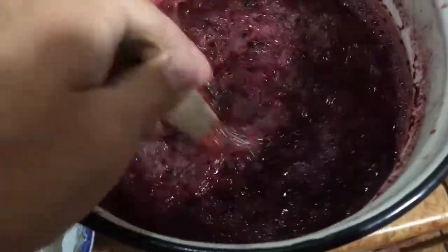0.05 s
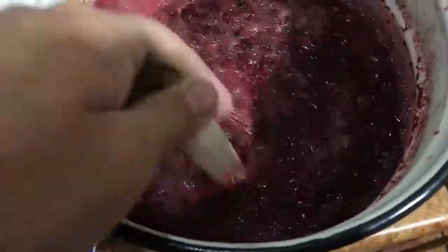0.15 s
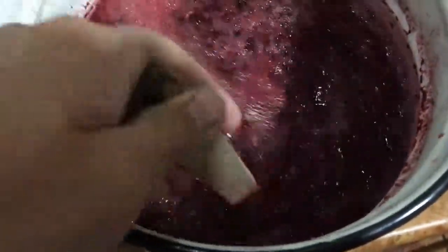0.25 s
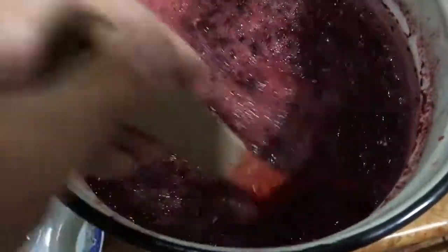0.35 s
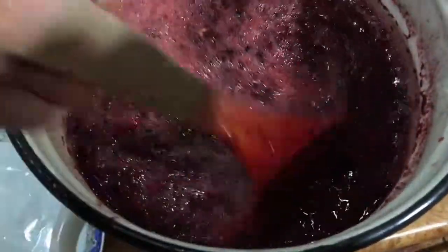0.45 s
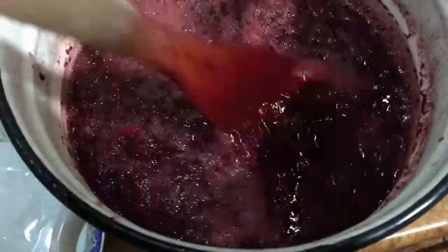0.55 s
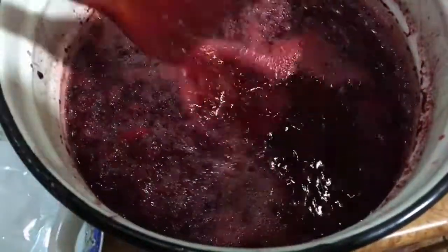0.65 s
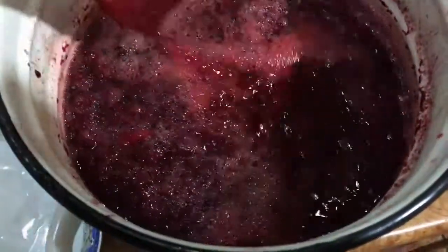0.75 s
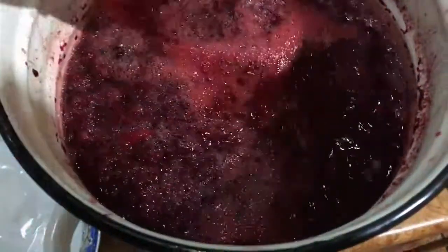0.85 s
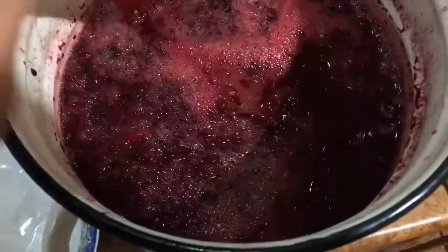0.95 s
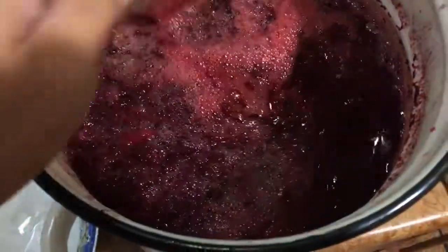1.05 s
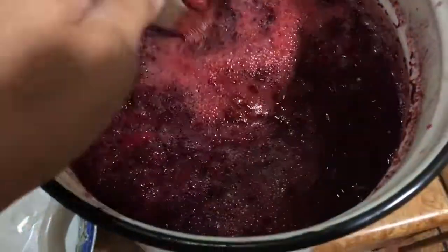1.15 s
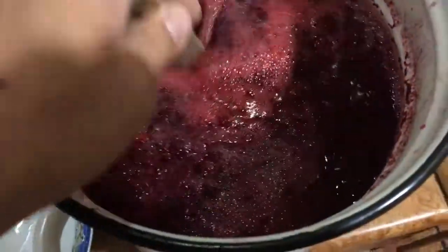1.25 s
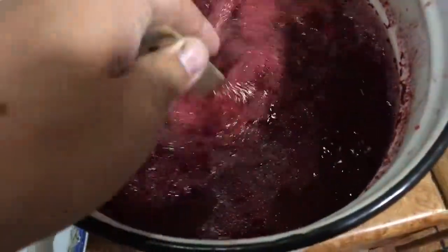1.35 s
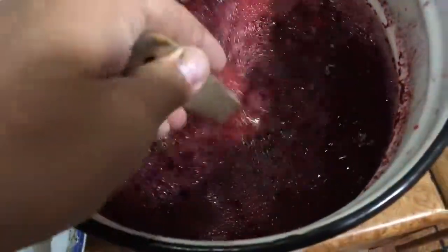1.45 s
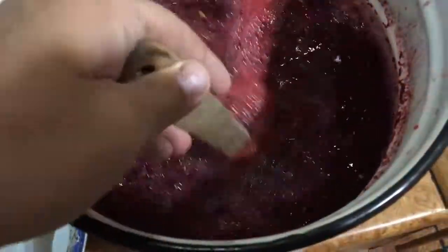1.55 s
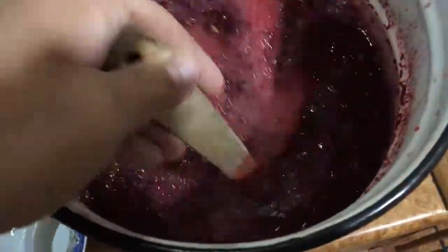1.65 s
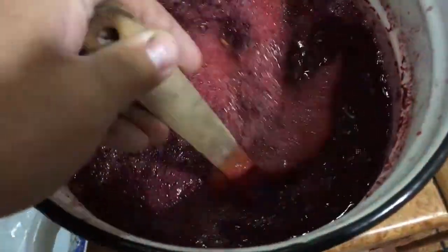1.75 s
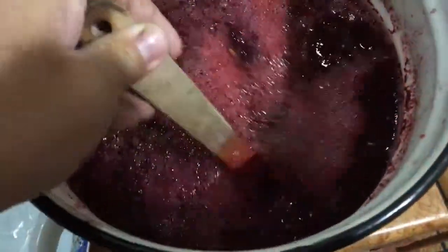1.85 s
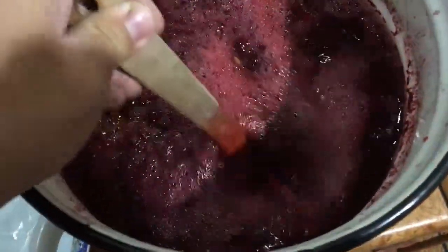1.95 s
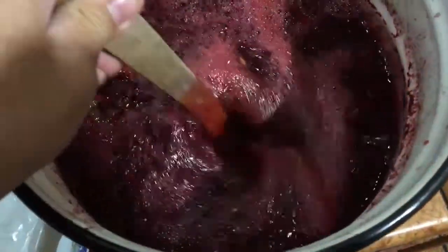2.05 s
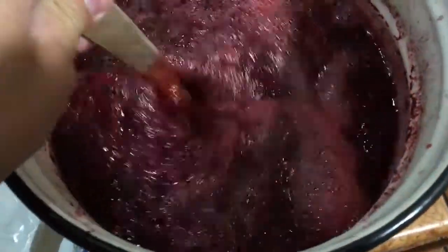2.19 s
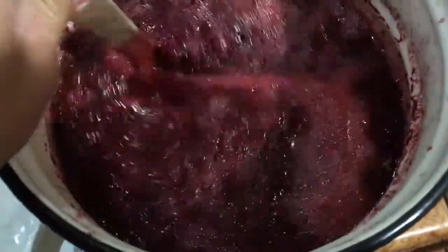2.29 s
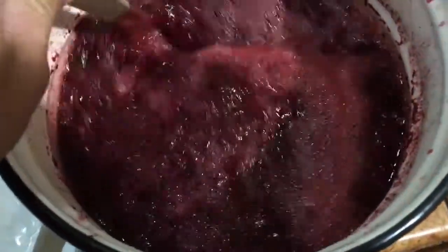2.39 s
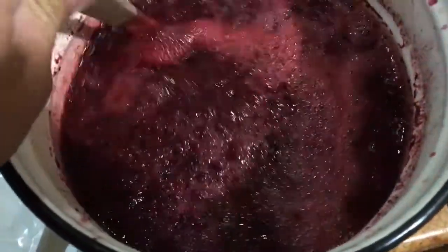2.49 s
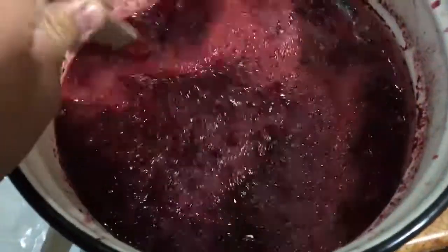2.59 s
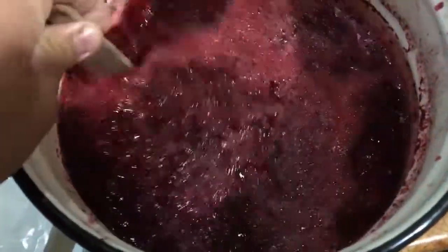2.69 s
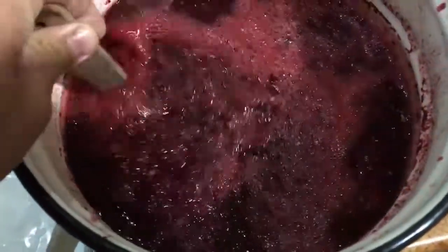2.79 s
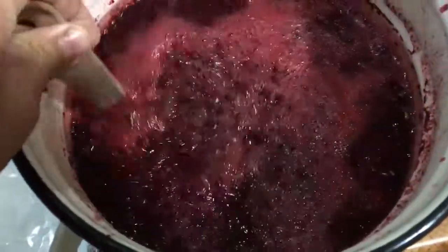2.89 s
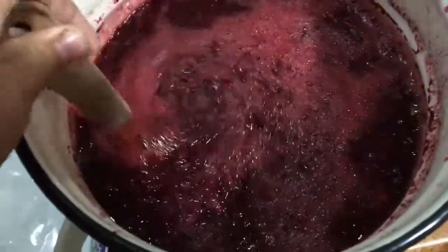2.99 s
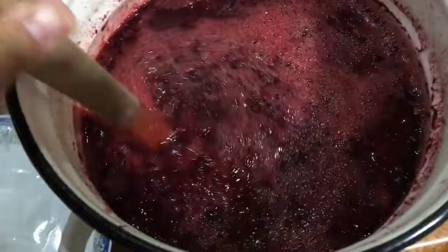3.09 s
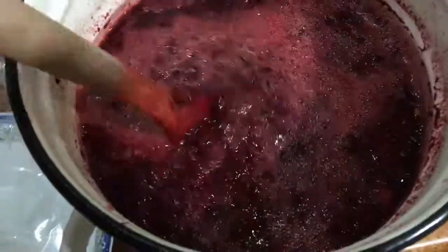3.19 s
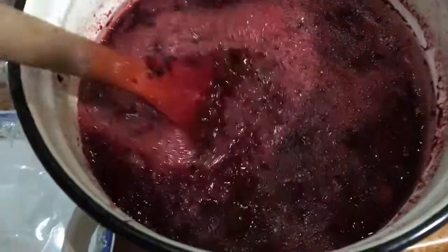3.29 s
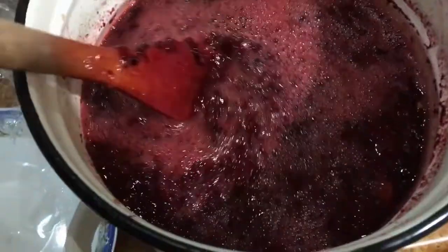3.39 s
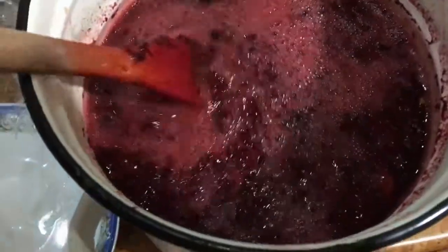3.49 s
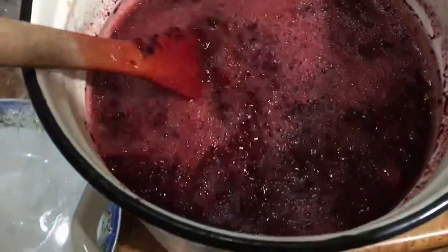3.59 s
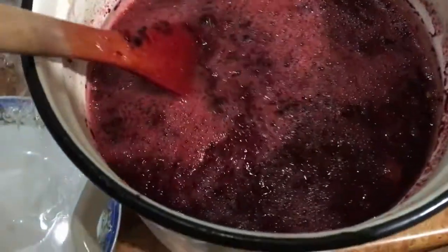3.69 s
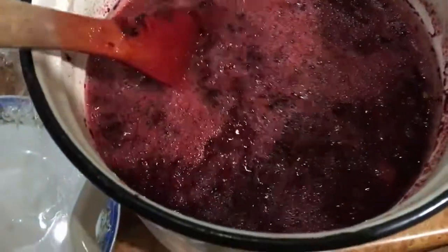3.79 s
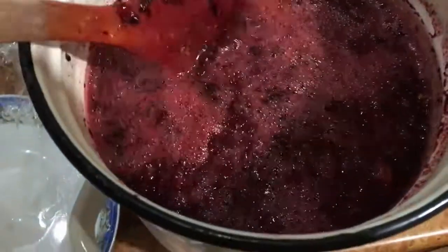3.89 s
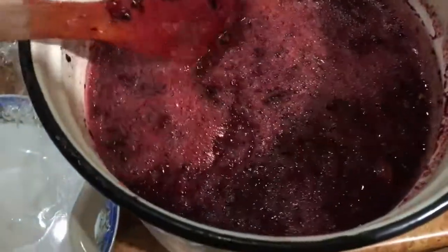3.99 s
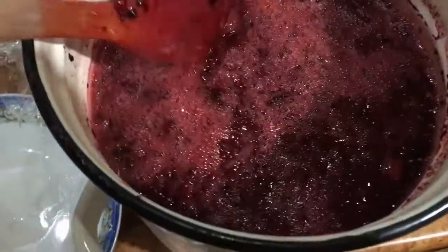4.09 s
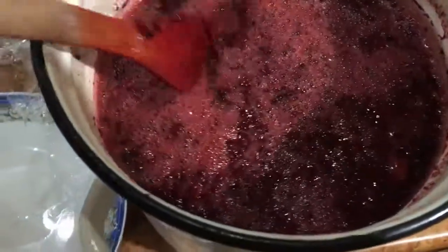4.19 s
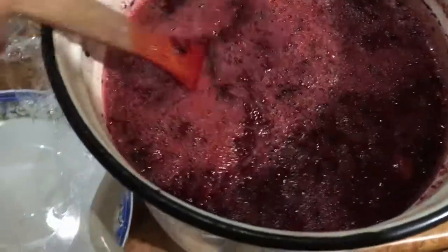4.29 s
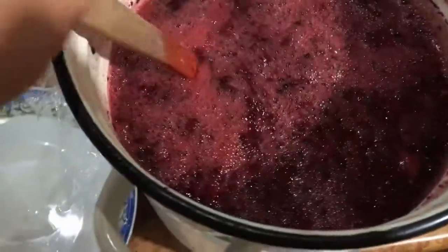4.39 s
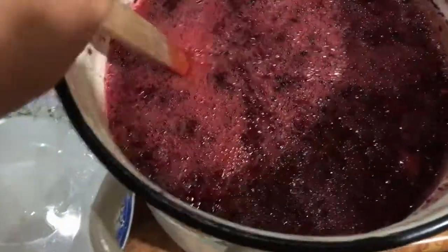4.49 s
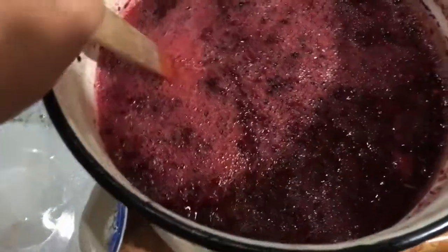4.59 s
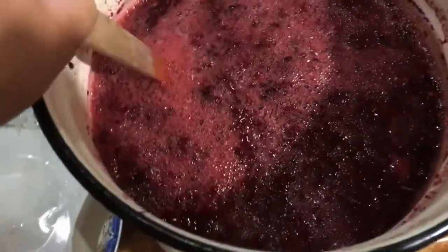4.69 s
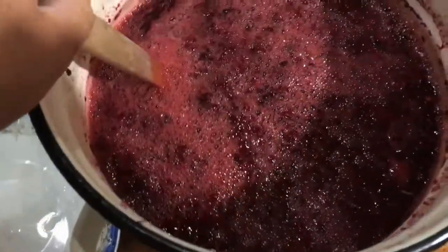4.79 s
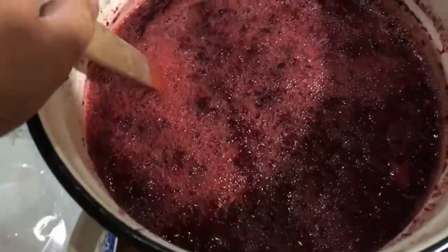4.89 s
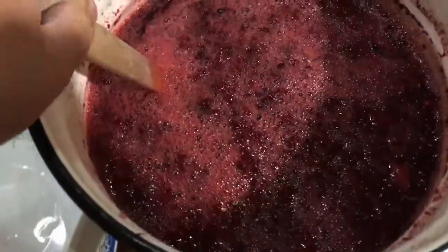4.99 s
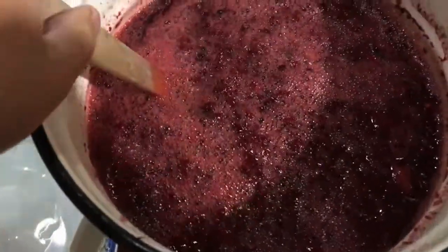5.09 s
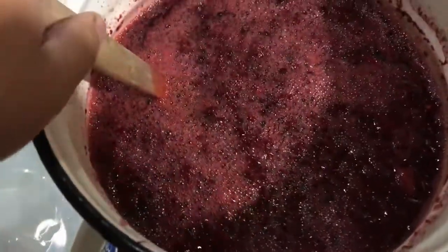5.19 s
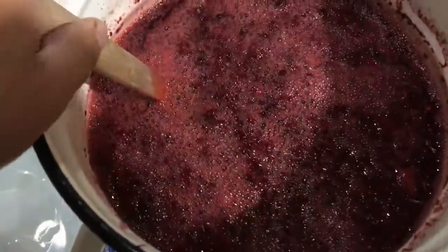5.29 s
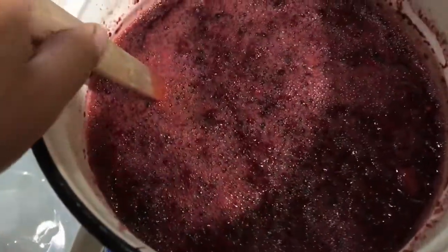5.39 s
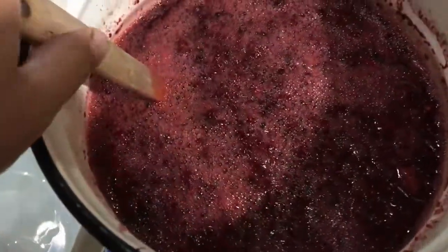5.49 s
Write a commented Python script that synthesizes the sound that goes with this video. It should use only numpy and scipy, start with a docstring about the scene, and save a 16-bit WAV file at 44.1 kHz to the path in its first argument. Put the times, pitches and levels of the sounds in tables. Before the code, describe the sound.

A wooden spatula stirs bubbling fruit mash in an enamel pot, heard close with a short room echo. First a low slosh and rubbing scrape, then muffled thuds with brief drags, wet snapping in the middle, one hard knock, and finally quiet fizz with softer double knock and tiny pitched bubbles.

```python
"""First heard: a low wet slosh and a wooden scrape over fine fizz, then dull knocks, clicks and crackle.
Place: a small kitchen, where a wooden spatula stirs fizzing fruit mash in an enamel pot on a counter.
Shaped noise makes rumble and slosh; short damped tones make fizz, crackle, clicks, bubbles and slips.
Blows and irregular grips of the blade ring the damped modes of the pot. The room echoes all but the
rumble, slosh, fizz and crackle; one microphone channel loses the deepest bass and the extreme treble."""
import sys
import numpy as np
from scipy import signal
from scipy.fft import rfft, irfft
from scipy.io import wavfile
from scipy.ndimage import uniform_filter1d

SR = 44100
rng = np.random.default_rng(int(sys.argv[2]) if len(sys.argv) > 2 else 0)


def master(y):
    """Save y as 16-bit WAV."""
    cut = np.clip(np.atleast_2d(y).T, -1, 1)
    pcm = np.round(cut * 32767)  # scale
    wavfile.write(sys.argv[1], SR, pcm.astype(np.int16))


N = 244660

# kitchen rumble and slosh of the mash: [t/s, rumble level/dB, slosh level/dB]
SLOSH_LEVELS = [(0, -53, -42.5), (.15, -60, -58), (.28, -62, -60.5), (.5, -69, -66), (1.0, -63.5, -60.5),
                (1.6, -65.5, -64.5), (2.7, -61.5, -60.5), (3.4, -68.5, -63.5), (4.2, -65, -67),
                (4.7, -59.5, -62), (5.15, -67.5, -66.5), (5.55, -62, -66.5)]
# common colour of rumble and slosh: [f/Hz, relative density/dB]
SLOSH_SPECTRUM = [(15, -35), (25, -5), (64, 11.5), (124, -1.5), (324, -4.5), (371, -7.5), (546, -8.5),
                  (757, -16.5), (802, -11.5), (1090, -11.5), (1250, -11.5), (1770, -8.5), (2500, -5.5),
                  (3250, -71), (5500, -120)]
# bursting bubbles, before flicker: [t/s, level/dB]
FIZZ_LEVELS = [(0.0, -53.5), (0.46, -54.5), (0.99, -53), (1.59, -54.5), (2.1, -52.5), (3.2, -52.5),
               (4.4, -53.5), (5.33, -56), (5.55, -54.5)]
# colour of the fizz, notched by the echo inside the pot: [f/Hz, relative density/dB]
FIZZ_SPECTRUM = [(900, -31), (1700, -14), (2300, -3.5), (3300, -0.5), (4200, 0.5), (4900, -0.5), (5600, 2),
                 (6800, 4), (7600, 1.5), (8900, 4.5), (9800, 3.5), (10300, -0.5), (11300, 2.5),
                 (16000, -3.5)]
# echo of the kitchen: [f/Hz, t60/s, echo level/dB]
ROOM_ECHO = [(59, 0.35, 7), (247, 0.26, -15.5), (700, 0.2, -12), (1540, 0.26, -7), (4000, 0.083, -8)]
# crackle bursts of skins and foam turned over by the blade: [t/s, level/dB]
CRACKLE_BURSTS = [(2.12, -67), (2.4, -64), (2.79, -62)]
# larger bubbles that burst with a pitch: [t/s, peak level/dB, f/Hz, t60/s]
PITCHED_BUBBLES = [(4.636, -53, 614, 0.015), (4.789, -68, 496, 0.029), (4.982, -56, 700, 0.015),
                   (5.215, -54.5, 1050, 0.016), (5.247, -52, 1100, 0.019)]
# wet clicks and pops in the mash: [t/s, peak level/dB, f/Hz, t60/s, neighbours' relative level/dB]
WET_CLICKS = [(1.125, -39, 2800, .006, -8), (2.11, -42.5, 2970, .008, -7), (2.135, -44, 1390, .008, -1),
              (2.151, -35, 2000, 0.014, -16), (2.169, -38, 3100, 0.01, -15), (2.199, -40, 3300, 0.014, -14),
              (2.239, -33, 2200, 0.029, -7.5), (2.327, -43, 3300, 0.0088, -16),
              (2.8095, -29, 2670, 0.0036, -10.5)]
# slips of the blade that stand out of a stroke: [t/s, peak level/dB, f/Hz, t60/s]
BLADE_SLIPS = [(0.175, -25.5, 461, 0.02), (0.202, -27.5, 470, 0.03), (0.243, -35.5, 376, 0.041),
               (2.805, -39.5, 406, 0.02), (2.918, -49, 295, 0.014), (2.958, -47, 332, 0.04),
               (3.003, -64, 397, 0.028), (3.038, -34.5, 446, 0.04), (3.086, -37.5, 510, 0.013)]
# modes of the filled pot and the counter under it: [f/Hz, level/dB, t60/s before a blow's ring factor]
POT_MODES = [(58.6, -10, 1), (86.2, 4, 0.16), (107, -8.5, 0.68), (182.1, 0.5, 0.32), (239.1, -2.5, 0.31),
             (262.5, 6, 0.086), (308, -3.5, 0.14), (350, 8, 0.086), (417, -4, 0.056), (468, 9.5, 0.055),
             (529, 6.5, 0.064), (613.6, 4.5, 0.073), (659, -13, 0.049), (775, -0.5, 0.037),
             (918, -36, 0.27), (944, -15, 0.15), (994, 0, 0.051), (1094, 0, 0.027), (1208, -13, 0.092),
             (1385, -12.5, 0.06), (1710, -18, 0.044), (2030, -23, 0.11), (2216, -5, 0.071),
             (2760, 5, 0.078), (2870, -1, 0.045), (3160, 14.5, 0.036), (3500, 12, 0.014),
             (4180, -25, 0.018), (4600, -12, .015), (5600, -16, .015)]
# drags along the bottom, one list a stroke: [t/s, level/dB, best excited f/Hz, brightness/dB]
STROKES = [
    [(0, -45.5, 335, -40), (.086, -41, 430, -7.5), (.142, -44, 420, -15.5), (.21, -38.5, 443, -18),
     (.225, -56, 440, -7), (.254, -47.5, 398, -20), (.29, -77, 379, -17)],
    [(.77, -65, 525, -5), (1.1, -63.5, 524, -6), (1.36, -64, 500, -5), (1.41, -42, 380, -20)],
    [(1.45, -43, 337, -18), (1.52, -57, 384, -20), (1.62, -65, 390, -18)],
    [(1.9, -62, 514, -24), (2.1, -72, 380, -6), (2.15, -54.5, 382, -3), (2.23, -75, 405, -14)],
    [(2.66, -78, 478, -23), (2.69, -52.5, 530, -35), (2.752, -51, 570, -35), (2.802, -49, 433, -4),
     (2.852, -52.5, 555, -20), (2.884, -49, 306, -16), (2.974, -48.5, 312, -45), (3.008, -42.5, 414, -26),
     (3.11, -58.5, 516, 4)],
    [(3.12, -67.5, 537, -15), (3.5, -74.5, 533, -12)],
]
# blows of the blade: [t/s, level/dB, best excited f/Hz, spread/octaves, counter boom/dB, boom f/Hz,
# edge crack/dB, crack f/Hz, ring length/factor, shove/dB]
BLOWS = [(.391, -46.5, 430, 0.1, -14.5, 81, -4.5, 990, 1.7, -18),
         (1.097, -30.5, 219, 0.21, -5.5, 111, -16.5, 536, 0.93, -25),
         (1.4032, -13, 242, 0.38, -37, 57.7, -24, 640, 0.89, -31),
         (1.504, -33, 404, 0.14, -30, 80, -32, 900, 1.1, -35),
         (1.754, -32.5, 183, 0.34, -15, 65.4, -20, 483, 1.5, -19),
         (1.78, -44.5, 457, 0.56, -18, 65, -8, 970, 1.2, -22),
         (1.875, -42, 304, 0.41, -32, 80, -16, 890, 1, -27),
         (2.036, -47, 367, 0.18, -28, 81.5, -3, 980, 0.97, -20),
         (2.246, -23, 187, 0.41, -36, 61, -9, 338, 0.97, -14.5),
         (2.4934, -17, 550, 0.42, -25, 80, -9, 250, 0.43, -39),
         (3.5324, -10.5, 456, 0.92, -22, 67, -5, 1328, 0.57, -32),
         (4.529, -45, 173, 0.55, -18, 59, -7, 1320, 0.55, -8),
         (4.665, -29, 263, 0.56, -14.5, 100, -3.5, 1050, 0.67, -20),
         (4.684, -36, 360, 0.28, -3.5, 167, -20, 800, 0.72, -28),
         (5.166, -51.5, 300, 0.49, -7, 80, 2, 1270, 0.64, -13),
         (5.492, -51.5, 760, 0.34, -12, 80, -16, 1100, 0.92, -19)]

CRACKLE_REST_DB, CRACKLE_RISE_DB_PER_S, CRACKLE_FALL_DB_PER_S = -74, 146, 135
SNAP_DB, SNAP_S = 11, 0.0018  # dry puff of a click: level above its neighbours, decay time
STROKE_EDGE_S = 0.011  # the drag sets in and lets go
CHATTER_DB, CHATTER_S = -4.5, 0.0037  # rattle of the edge: level against its crack, decay time
SHOVE_HZ, SHOVE_S = 53.4, 0.015  # thump of the whole pot on its base
MIC_LOW_HZ, MIC_TOP_HZ = 36, 15720


def gain_of(db):
    """Decibels to gain."""
    return 10 ** (np.asarray(db) / 20)


def evened(x):
    """Scales to rms 1."""
    return x / np.sqrt(np.mean(x ** 2) + 1e-20)


def read(points, hz):
    """Reads a spectrum on a log-frequency axis."""
    f, value = np.transpose(points)
    return np.interp(np.log(hz + 1), np.log(f + 1), value)


def curve(rows):
    """One value a sample from rows of [t/s, value]."""
    return np.interp(np.arange(N) / SR, *np.transpose(rows))


def colour(x, points):
    """Shapes a steady sound with a spectrum, rms 1."""
    density_db = read(points, np.fft.rfftfreq(len(x), 1 / SR))
    return evened(irfft(rfft(x) * gain_of(density_db), len(x)))


def band_of(x, order, edges_hz, kind="band"):
    """Filters a sound with Butterworth slopes."""
    return signal.sosfilt(signal.butter(order, edges_hz, kind, fs=SR, output="sos"), x)


def random_hits(count, per_s, spread_db, most):
    """Impulses at random moments, with exponentially spread levels capped at `most` spreads."""
    size = gain_of(spread_db * np.minimum(rng.exponential(1, count), most))
    return size * (rng.random(count) < per_s / SR)


def add(mix, s, sound):
    """Mixes a sound in at time s."""
    part = mix[round(s * SR):][:len(sound)]
    part += sound[:len(part)]


def blip(db, hz, t60, rise_cycles):
    """A short damped ring with a soft start, scaled to its peak level."""
    t = np.arange(4000) / SR
    rise = 1 - np.exp(-(t * hz / rise_cycles) ** 2)
    ring = gain_of(-60 * t / t60) * rise * np.sin(2 * np.pi * hz * t)
    return gain_of(db) * ring / abs(ring).max()


def bell(hz, centre_hz, octaves):
    """Share of a push that reaches a mode, falling away from the best excited pitch."""
    return np.exp(-.5 * (np.log2(hz / centre_hz) / np.maximum(octaves, .1)) ** 2)


def slosh(lumpy_db=2.2, split_hz=145, top_hz=800):
    """Room rumble and mash slosh: two noise bands lump independently under an even upper layer."""
    noise = colour(rng.standard_normal(N), SLOSH_SPECTRUM)
    rows = np.array(SLOSH_LEVELS)
    out = gain_of(-70) * evened(band_of(noise, 4, top_hz, "high"))
    for column, edges_hz in [(1, [20, split_hz]), (2, [split_hz, top_hz])]:
        lumps = evened(uniform_filter1d(rng.standard_normal(N), 2500))
        level_db = curve(rows[:, [0, column]]) + lumpy_db * lumps
        out = out + gain_of(level_db) * evened(band_of(noise, 3, edges_hz))
    return out


def fizz(per_s=12000, spread_db=4.5, flicker_db=0.61, cycles=1.77):
    """Tiny bubbles of many sizes, each a few cycles long, over the blur of the countless far ones."""
    t, pops = np.arange(128) / SR, np.zeros(N)
    sizes_hz = np.geomspace(1800, 15000, num=16)
    for hz in sizes_hz:
        bursts = random_hits(N, per_s / len(sizes_hz), spread_db, 5)
        pop = np.sin(2 * np.pi * hz * t) * hz * t * np.exp(-hz * t / cycles)
        pops += signal.oaconvolve(bursts, pop * np.sqrt(hz) / np.linalg.norm(pop))[:N]
    flicker = evened(uniform_filter1d(rng.standard_normal(N), 1500))
    blur = rng.standard_normal(N)
    level_db = curve(FIZZ_LEVELS) + flicker_db * flicker
    return gain_of(level_db) * colour(0.47 * evened(pops) + blur, FIZZ_SPECTRUM)


def kitchen(x):
    """Echo of the room: sparse taps of random sign, each band dying at its own speed."""
    taps, walls = np.zeros(SR // 2), np.array(ROOM_ECHO)
    at = np.arange(200, len(taps) - 20, 20)
    taps[at + rng.integers(0, 20, len(at))] = rng.choice([-1., 1.], len(at))
    hz, t, bands = signal.stft(taps, SR, nperseg=512)
    fade = gain_of(-60 * t / read(walls[:, :2], hz)[:, None])
    # every band carries the energy of its echo level
    fade = fade / np.sqrt(np.mean(fade ** 2, 1, keepdims=True))
    fade = fade * gain_of(read(walls[:, ::2], hz))[:, None]
    echo = signal.istft(bands * fade, SR, nperseg=512)[1] / np.sqrt(len(at))
    return signal.oaconvolve(x, echo)[:N]


def crackle(per_s=500, spread_db=-3.0):
    """Skins and foam: sparse small snaps of a few pitches, swelling and dying round each burst."""
    snaps, t = np.zeros(N), np.arange(N) / SR
    for hz in np.geomspace(1300, 4300, num=8):
        hits = random_hits(N, per_s / 8, spread_db, 4)
        snaps += signal.oaconvolve(hits, blip(0, hz, 0.0034, 0.55))[:N]
    level = gain_of(CRACKLE_REST_DB)
    for s, db in CRACKLE_BURSTS:
        drop_db = np.maximum(CRACKLE_RISE_DB_PER_S * (s - t), CRACKLE_FALL_DB_PER_S * (t - s))
        level = level + gain_of(db - drop_db)
    return level * evened(snaps)


def click(db, hz, t60, beside_db):
    """A film of mash snaps: a dry puff and a ring among shorter, closely spaced neighbours."""
    ratios = (.62, .75, .87, 1.15, 1.32, 1.52)
    beside = sum(blip(beside_db, hz * ratio, t60 * .7, .6) for ratio in ratios)
    puff = rng.standard_normal(4000) * np.exp(-np.arange(4000) / SR / SNAP_S)
    puff = band_of(puff, 4, [hz * 0.536, hz * 1.5])
    puff = gain_of(SNAP_DB + beside_db) * puff / abs(puff).max()
    snap = blip(0, hz, t60, 1.0) + beside + puff
    return gain_of(db) * snap / abs(snap).max()


def scrape(rows, per_s=900, spread_db=4.0):
    """Irregular grips of wood on enamel drive the damped modes of the pot."""
    s, *columns = np.transpose(rows)
    t = np.arange(s[0], s[-1], 1 / SR)
    db, centre_hz, bright_db = (np.interp(t, s, column) for column in columns)
    drag, ring = np.zeros(len(t)), np.arange(4000) / SR
    for hz, _, t60 in POT_MODES[3:20]:
        grips = random_hits(len(t), per_s, spread_db, 4) * rng.choice([-1., 1.], len(t))
        mode = np.sin(2 * np.pi * hz * ring) * gain_of(-60 * ring / t60)
        share = bell(hz, centre_hz, 0.44) + gain_of(bright_db) * bell(hz, 1020, 0.27)
        drag += signal.oaconvolve(grips * share, mode / np.linalg.norm(mode))[:len(t)]
    # even out the running level, so that the table sets it
    running_rms = np.sqrt(uniform_filter1d(drag ** 2, 4000) + 1e-12)
    edges = np.clip(np.minimum(t - s[0], s[-1] - t) / STROKE_EDGE_S, 0, 1)
    return s[0], gain_of(db) * drag / running_rms * edges


def knock(db, centre_hz, octaves, boom_db, boom_hz, crack_db, crack_hz, ring, shove_db):
    """Every mode of the pot rings with its share of the blow; the low ones swell more slowly."""
    hz, mode_db, t60 = np.transpose(POT_MODES)[:, :, None]
    t = np.arange(SR // 2) / SR
    body = bell(hz, centre_hz, octaves)
    boom = gain_of(boom_db) * bell(hz, boom_hz, 0.42)
    crack = gain_of(crack_db) * bell(hz, crack_hz, 0.56)
    share = body / np.linalg.norm(body) + boom + crack
    # another landing spot shifts the pitches a little
    drift = 1 + .007 * rng.standard_normal(hz.shape)
    # the mash closes round the blade and smothers the wall, not the counter
    smother = np.exp(-(t / (0.046 * ring)) ** 2 * (hz > 130))
    swell = 1 - np.exp(-(t * hz / 1.01) ** 2)
    fade = gain_of(mode_db - 60 * t / (t60 * ring))
    modes = share * swell * smother * fade * np.sin(2 * np.pi * hz * drift * t)
    # the hard edge chatters on the enamel for a moment: noise around the crack
    chatter = rng.standard_normal(len(t)) * np.exp(-t / CHATTER_S) * (1 - np.exp(-t * crack_hz))
    chatter = band_of(chatter, 3, [crack_hz * 0.31, crack_hz * 3.02])
    # the whole pot is shoved on its base: a short dull thump
    shove = np.e * t / SHOVE_S * np.exp(-t / SHOVE_S) * np.sin(2 * np.pi * SHOVE_HZ * t)
    impact = modes.sum(0) + gain_of(crack_db + CHATTER_DB) * chatter + gain_of(shove_db) * shove
    return gain_of(db) * impact


def scene():
    """The blade, wet clicks and pitched bubbles with their room echo, over crackle, fizz and slosh."""
    spatula = np.zeros(N)
    for s, *snap in WET_CLICKS:
        add(spatula, s, click(*snap))
    for s, db, hz, t60 in BLADE_SLIPS + PITCHED_BUBBLES:
        add(spatula, s, blip(db, hz, t60, 3.1))
    for rows in STROKES:
        add(spatula, *scrape(rows))
    for s, *blow in BLOWS:
        add(spatula, s, knock(*blow))
    return (slosh() + fizz() + crackle() + kitchen(spatula) + spatula)[None]


def record(dry):
    """A microphone that drops the deepest bass, then a steep limit on the treble."""
    lean = band_of(dry, 4, MIC_LOW_HZ, "high")
    treble_limit = signal.firwin(1023, MIC_TOP_HZ, window=("kaiser", 10), fs=SR)
    return signal.oaconvolve(lean, treble_limit[None], "same")


dry = scene()
out = record(dry)
master(out)
```